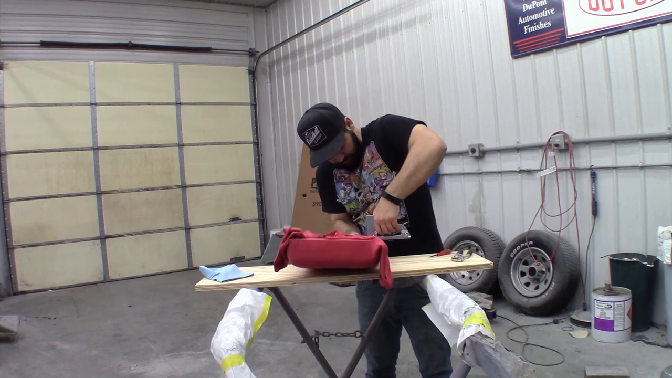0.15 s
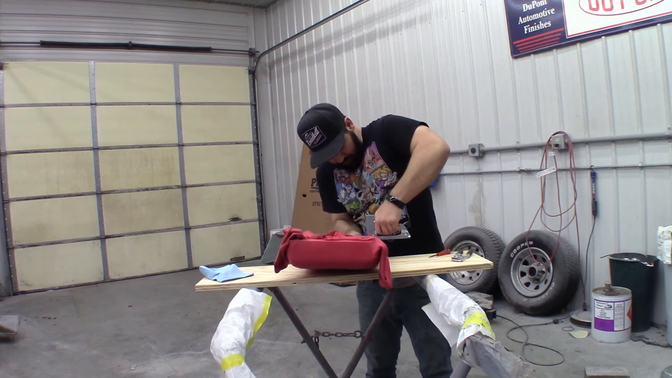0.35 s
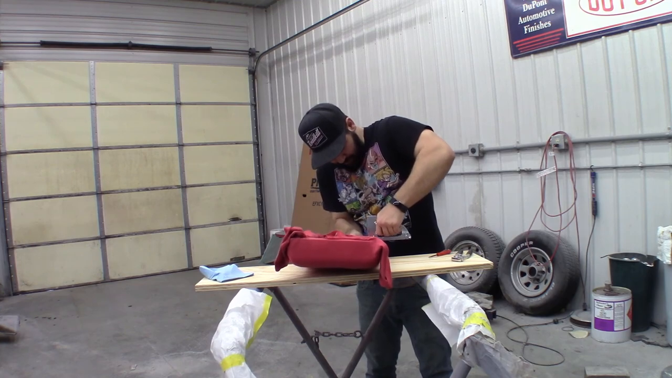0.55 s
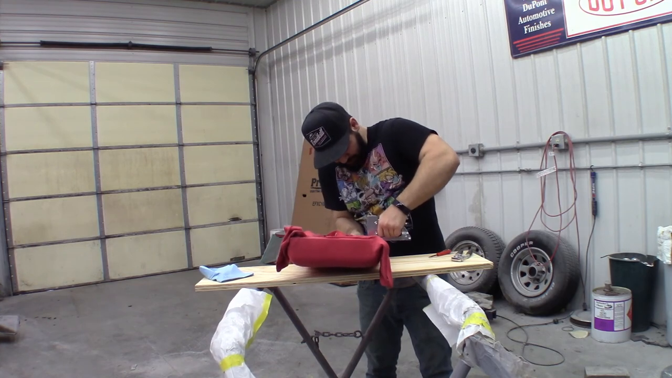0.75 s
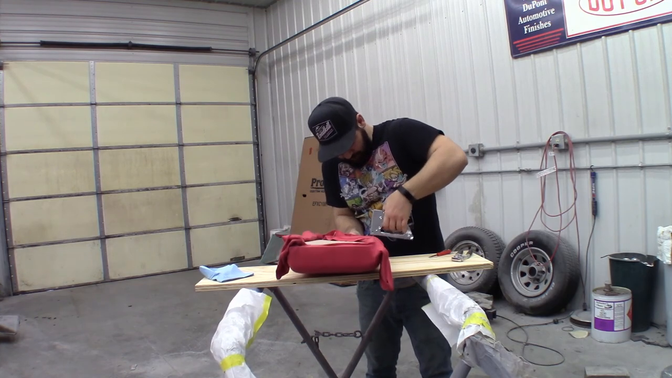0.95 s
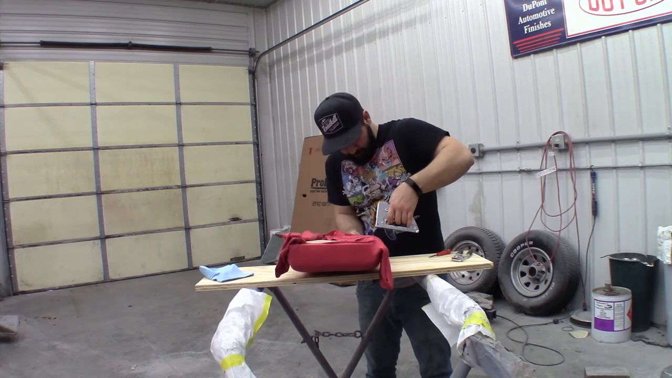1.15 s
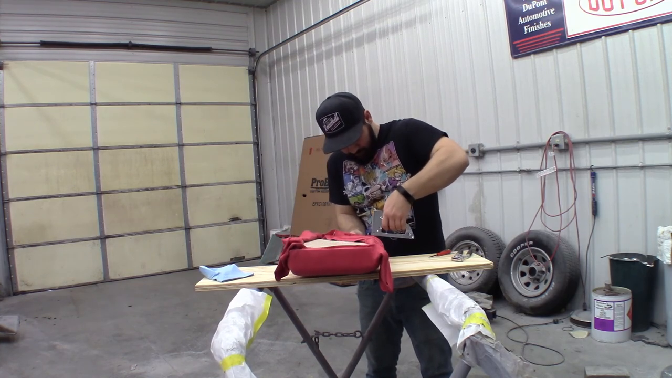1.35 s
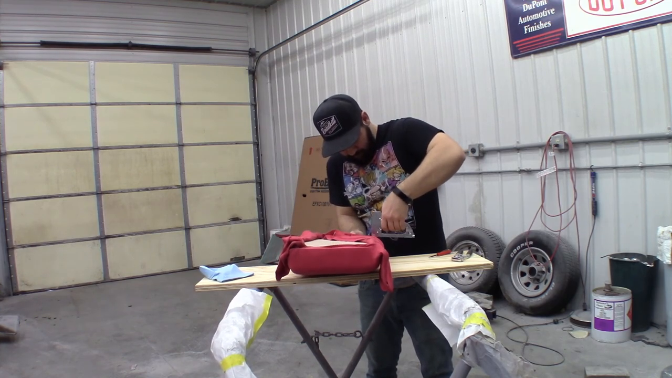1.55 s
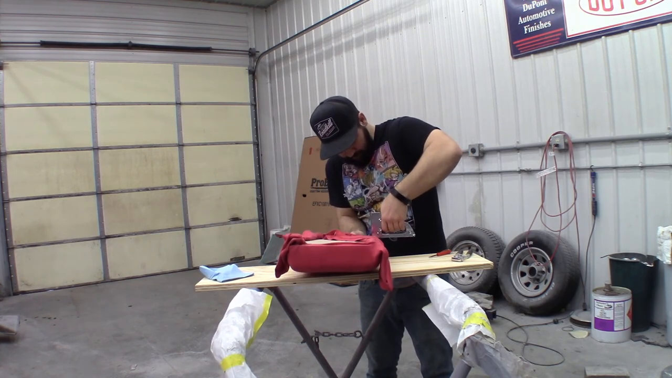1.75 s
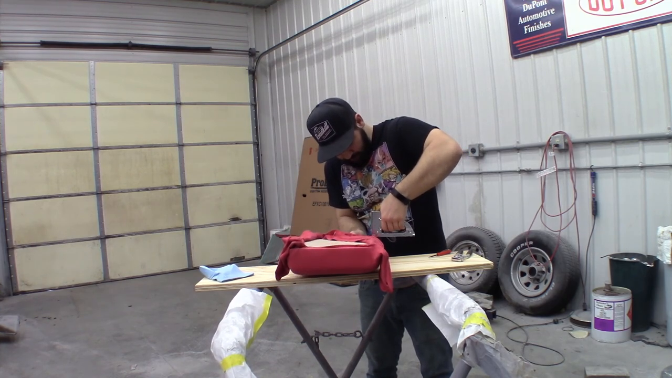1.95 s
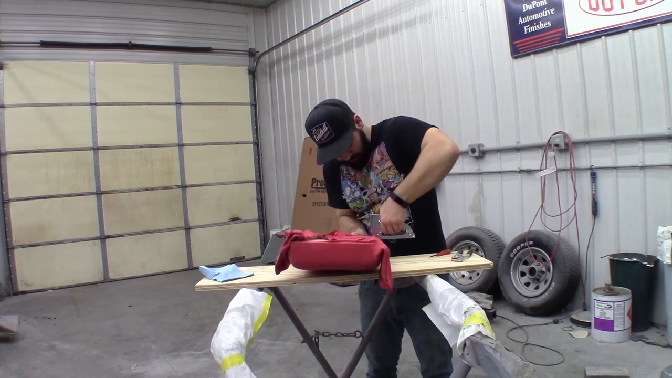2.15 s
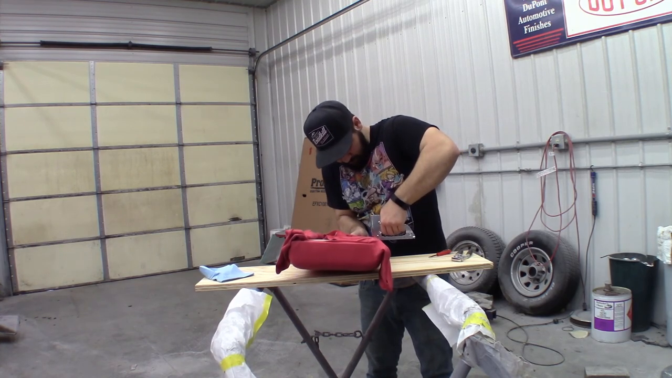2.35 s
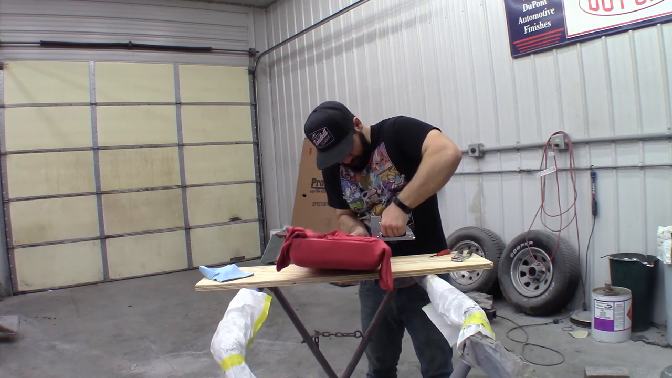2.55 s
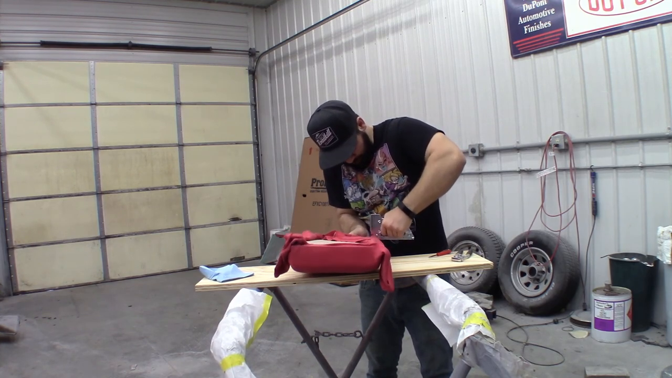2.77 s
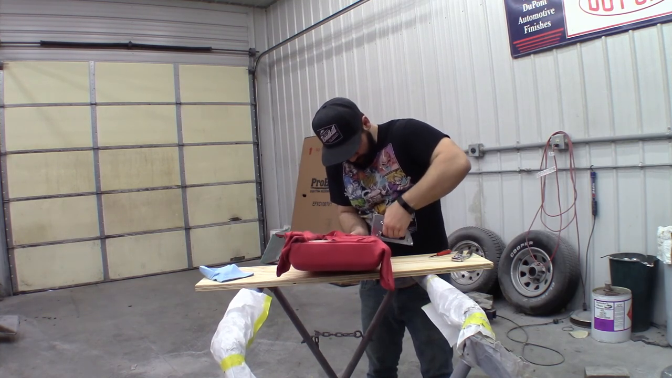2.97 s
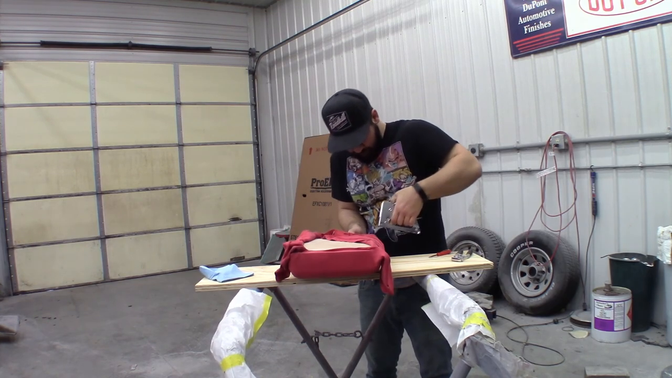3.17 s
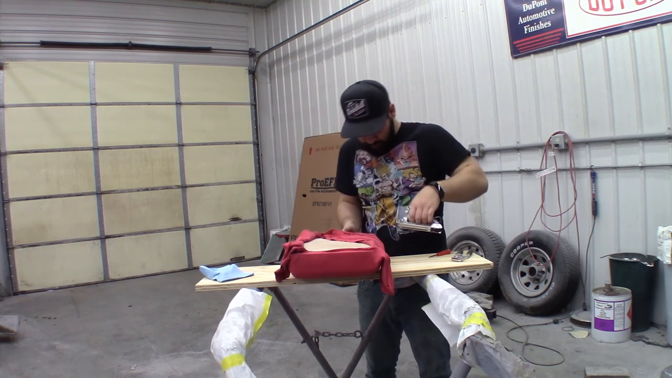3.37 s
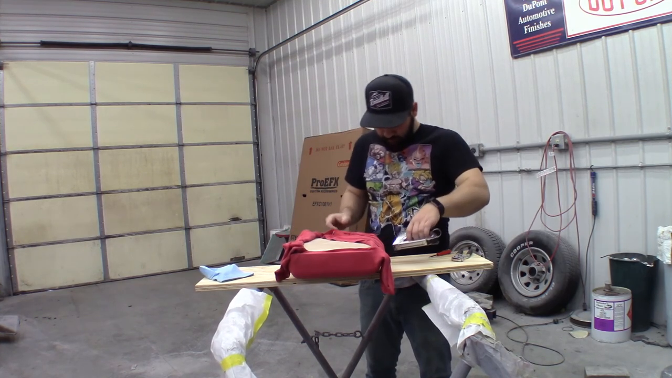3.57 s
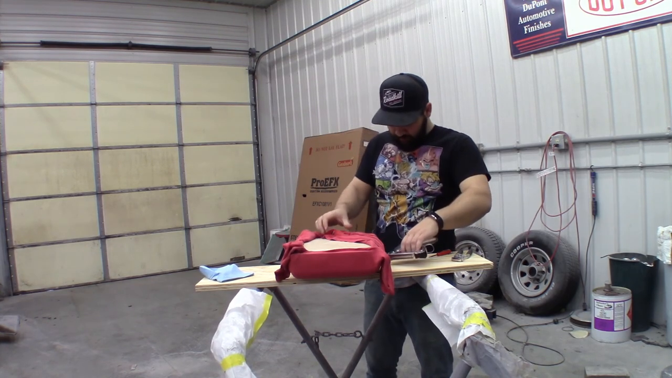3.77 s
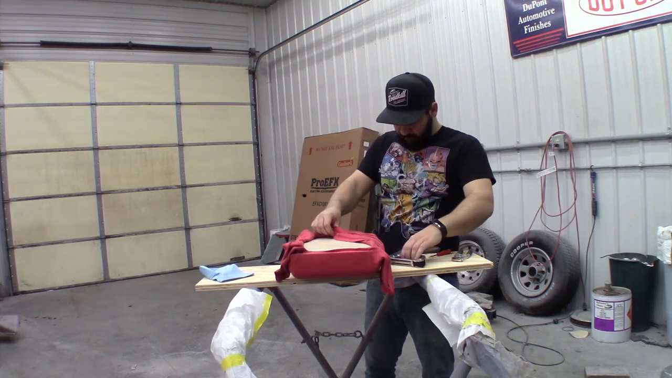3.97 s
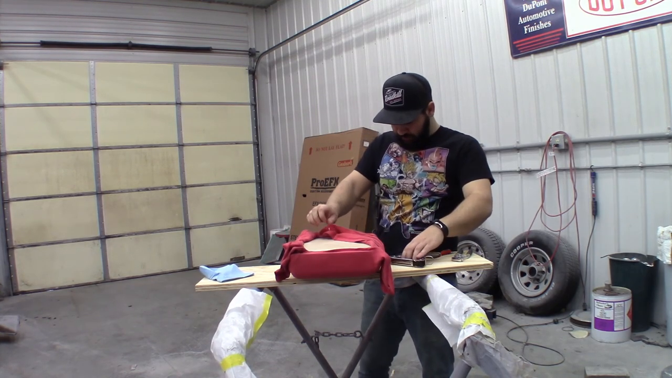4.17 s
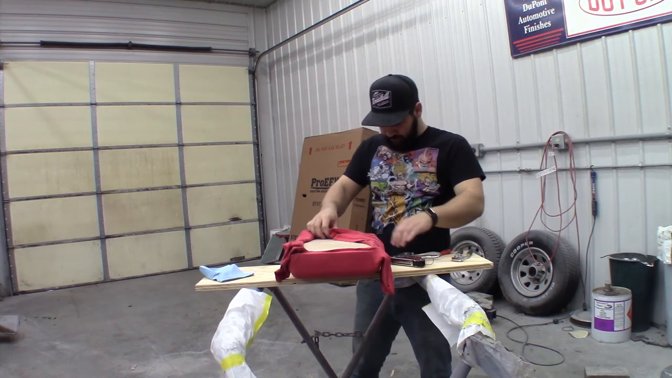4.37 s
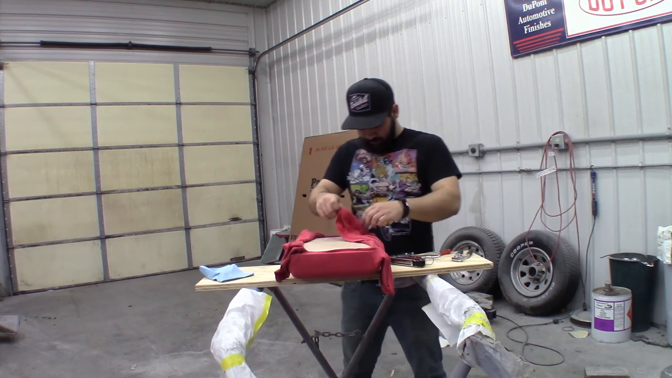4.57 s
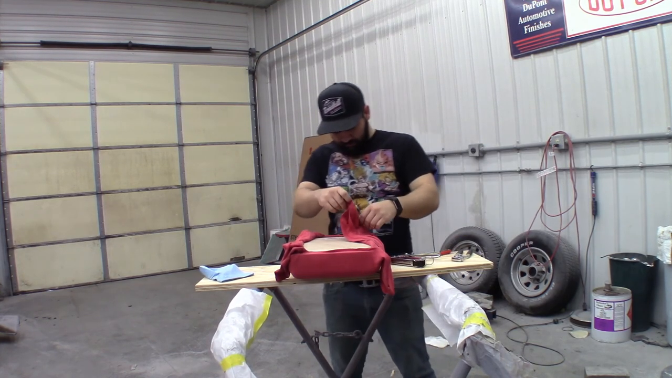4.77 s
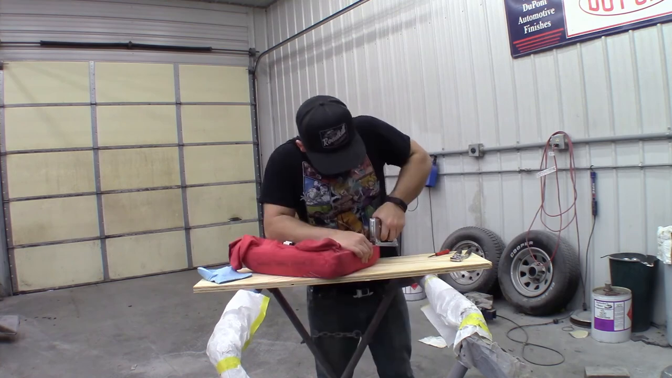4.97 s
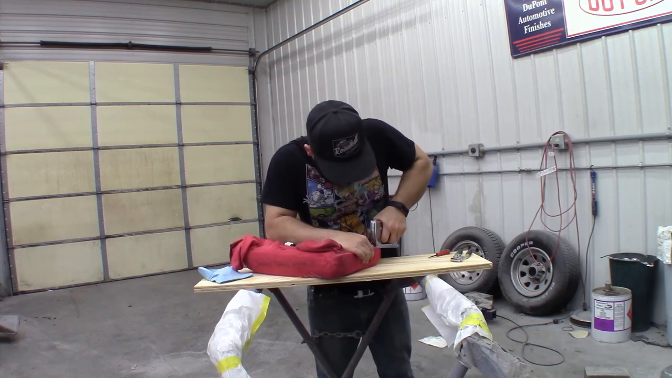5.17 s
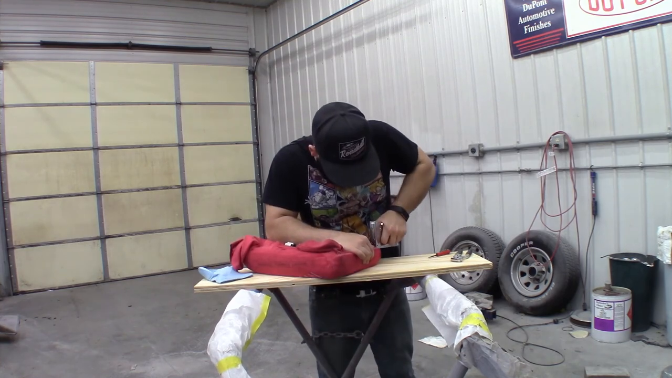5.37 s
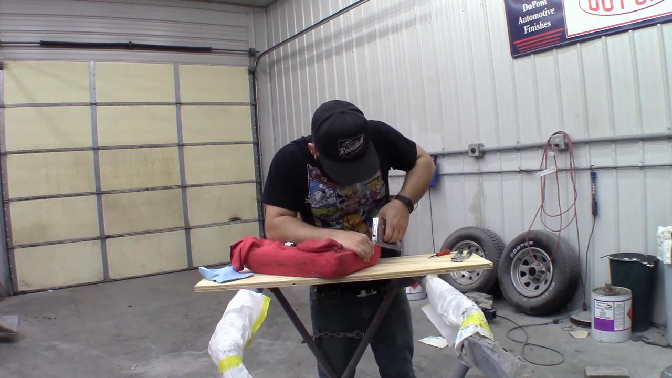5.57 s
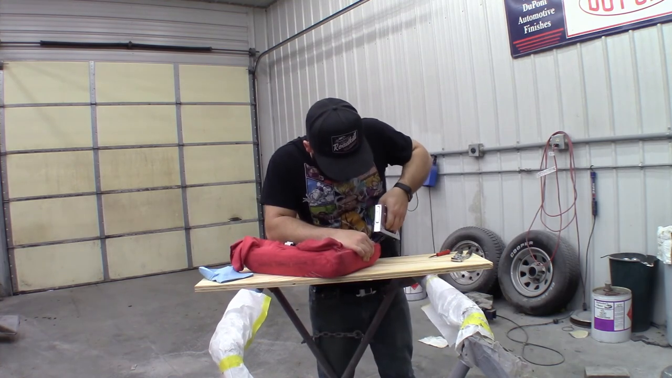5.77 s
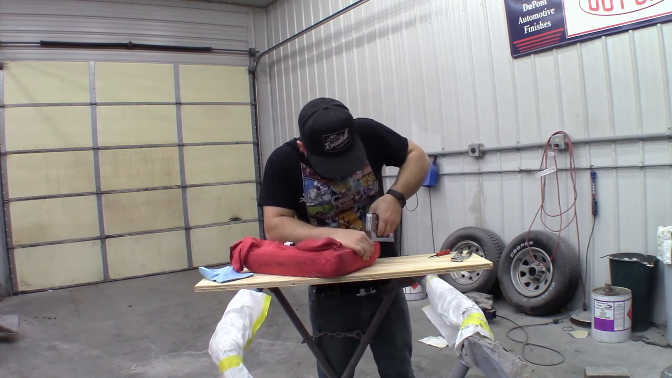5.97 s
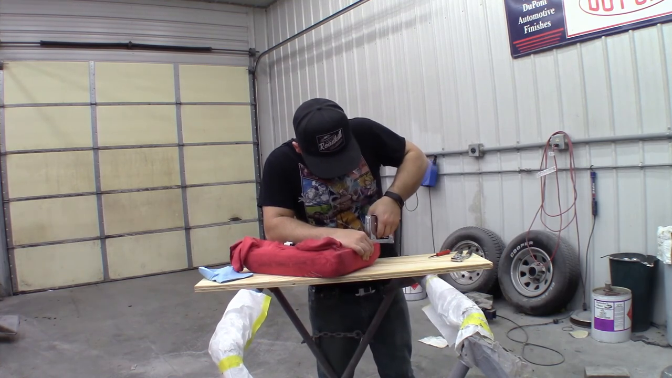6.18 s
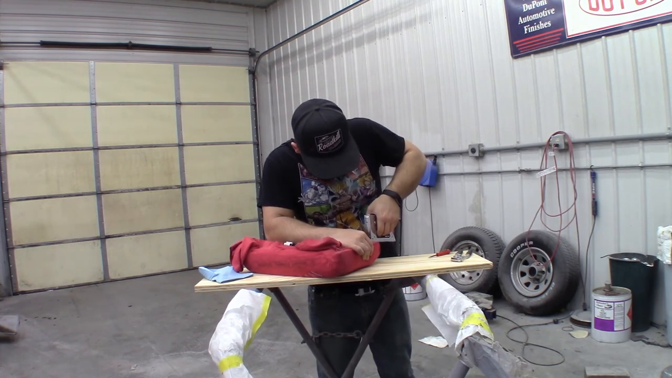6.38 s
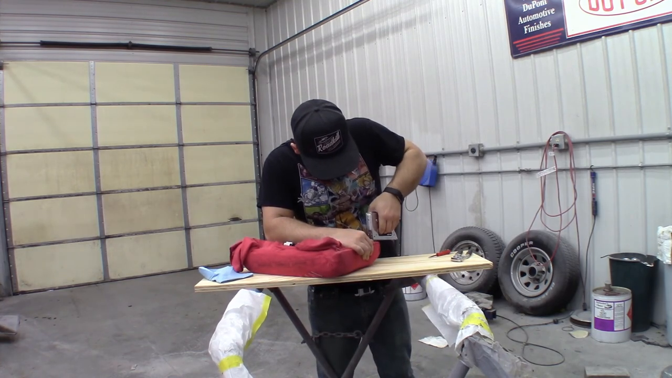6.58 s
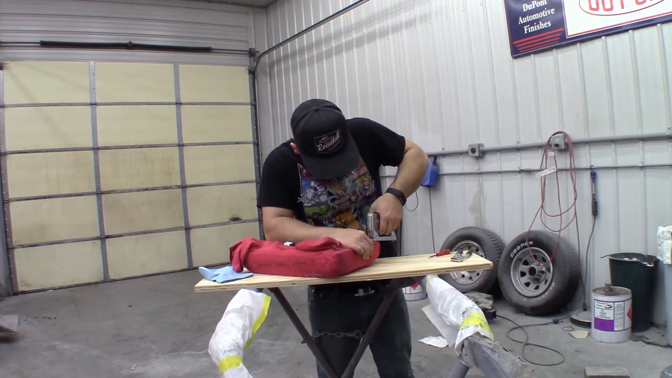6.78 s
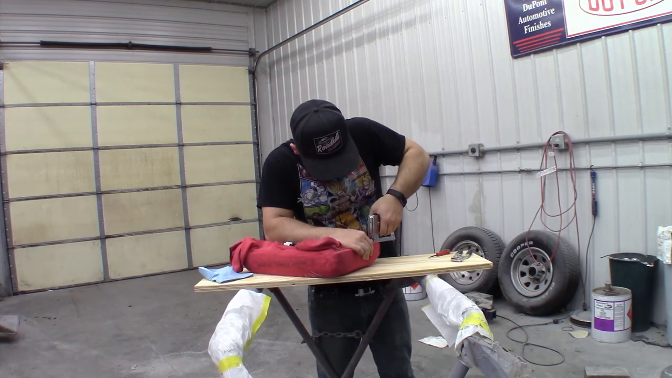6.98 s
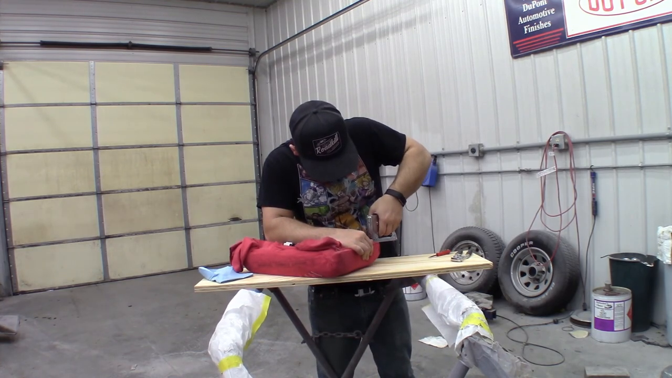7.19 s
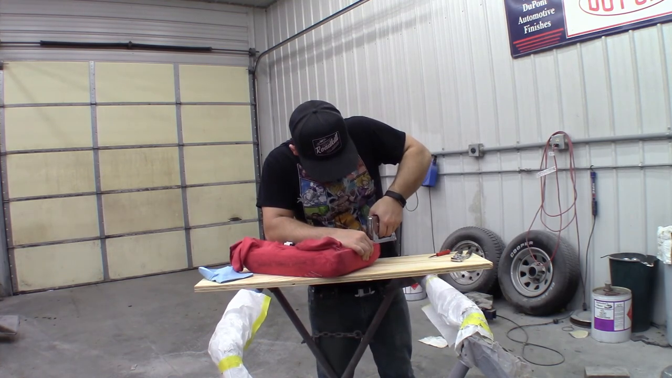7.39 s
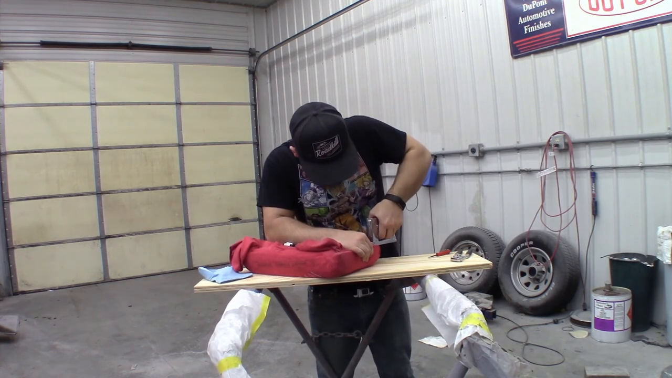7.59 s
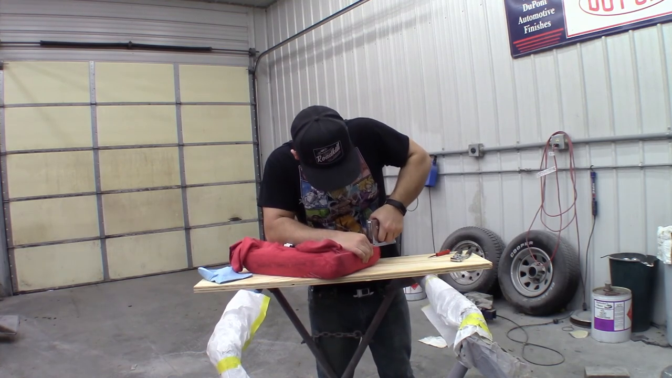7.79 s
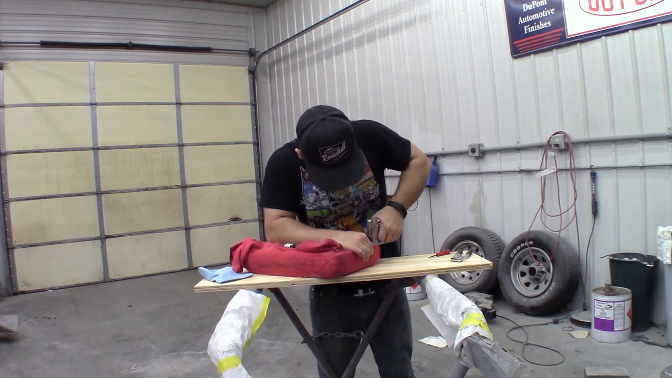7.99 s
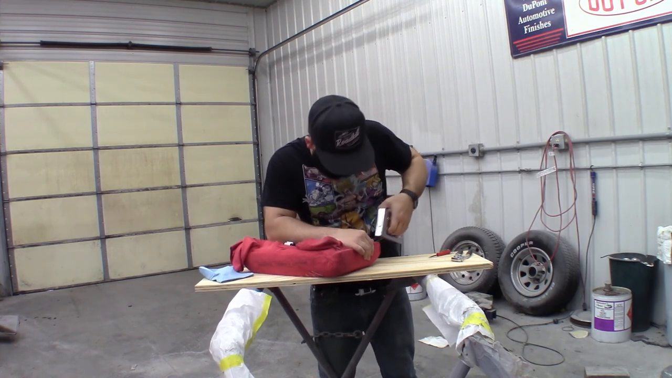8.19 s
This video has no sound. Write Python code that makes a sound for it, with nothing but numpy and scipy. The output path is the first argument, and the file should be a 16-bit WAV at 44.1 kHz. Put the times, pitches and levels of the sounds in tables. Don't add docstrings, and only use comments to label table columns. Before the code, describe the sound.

A hand stapler snaps hard four times, its lever clicking back after each shot; between them it rocks on a board in an echoing hall.

```python
import sys
import numpy as np
from scipy import signal
from scipy.fft import rfft, irfft
from scipy.io import wavfile
from scipy.ndimage import uniform_filter1d

SR = 44100
rng = np.random.default_rng(int(sys.argv[2]) if len(sys.argv) > 2 else 0)


def digitize_waveform(pressure):
    field = np.atleast_2d(pressure).T
    bounded = np.clip(field, -1, 1)
    quanta = np.round(bounded * 32767).astype(np.int16)
    wavfile.write(sys.argv[1], SR, quanta)


def gain_from_db(level_db):
    decades = np.asarray(level_db, float) / 20
    return 10 ** decades


N = 363384

# start_s, peak_db, hall_rms_db, treble_shaded_above_hz
SHOTS = [
    (0.6248, 3, -6.5, 4490),
    (2.786, 3.5, -6.5, 4360),
    (5.361, 2, -8, 10540),
    (7.922, 3, -7.5, 12500),
]
# pitch_hz, level_db (per Hz)
SEAT_COLOURS = [
    [(88, -74), (150, -39.5), (249, -26), (368, -30.5), (589, -1.5), (730, -11.5), (979, -6.5), (1340, -18),
     (1530, -13.5), (1870, -22), (2020, -14), (3040, -18.5), (7920, -23), (11500, -34), (16000, -55.5)],
    [(88, -64.5), (150, -37), (254, -20), (303, -35), (457, -9.5), (730, -4.5), (960, -4.5), (1420, -12.5),
     (3100, -10), (3620, -15.5), (4490, -18), (9080, -22.5), (13700, -39.5), (15100, -56), (16000, -92)],
    [(88, -60), (150, -32), (297, -14), (368, -21.5), (475, -5), (759, -8.5), (837, -3.5), (2060, -11),
     (2500, -4), (2760, -10.5), (3490, -12.5), (9820, -21), (10800, -25), (15100, -38.5), (16000, -92)],
    [(88, -68), (150, -43.5), (291, -15), (391, -21), (484, 3), (716, -6), (837, -2.5), (1310, -7),
     (2060, -17.5), (2600, -9), (4080, -19.5), (6910, -16), (13200, -31), (15300, -43), (16000, -73)],
]
# pitch_hz, width_hz, lift_db
GRIP_RESONANCES = [
    [(1618, 200, 5.5), (2520, 310, 4.5), (3040, 370, 9.5), (4204, 120, 4), (4600, 260, 4.5),
     (5990, 300, 5.5)],
    [(1050, 120, 3), (1622, 97, 4.5), (2300, 300, 1.5), (3007, 580, 2), (4140, 140, 2), (4300, 350, 2.5)],
    [(1303, 150, 4), (1960, 110, 1.5), (2330, 150, -4.5), (3000, 200, 3), (4250, 350, -0.5), (7300, 810, 5)],
    [(1300, 120, 4.5), (1940, 170, 3), (2550, 370, 2.5), (3192, 310, 3), (4500, 510, 5.5), (8500, 930, 3)],
]
# start_s, peak_db, centre_hz, length_ms
LATCH_SLIPS = [
    (.6026, -30.5, 3000, 6.3),
    (2.7493, -24, 3400, 5),
    (2.767, -32.5, 5000, 3.1),
    (5.344, -21.5, 6500, 1.9),
    (7.9097, -21.5, 6500, 1.8),
]
# start_s, peak_db, centre_hz, spring_at_stop_db, spring_at_rebound_db
LEVER_RETURNS = [
    (.934, -17, 8500, -15, -13),
    (3.0675, -10, 6860, -25, -9.5),
    (5.644, -9.5, 7860, -46, -33),
    (8.1844, -12, 7840, -44, -50),
]
# pitch_hz, level_db, t60_s
SPRING_MODES = [(6775, -1, 0.026), (7690, -19, 0.02), (9190, -12, .018), (11200, -14, .015)]
# start_s, peak_db, centre_hz
CLICKS = [(1.139, -38, 8800), (1.586, -46, 6950), (2.2713, -42, 7000), (3.409, -50, 10200),
          (3.676, -48, 9600), (3.7, -51, 9060), (3.806, -45, 7000), (3.877, -31.5, 2450),
          (3.9102, -29.5, 7000), (3.932, -41, 5000), (4.034, -26.5, 3000), (4.044, -28.5, 7840),
          (4.046, -37, 5400), (4.065, -43, 8000), (4.2344, -42, 6000), (4.4105, -39.5, 5000),
          (4.565, -51.5, 8000), (4.75, -56.5, 3535), (5.037, -44, 1940), (5.1837, -51, 9000),
          (8.135, -36, 9000), (5.593, -30, 10970), (5.6454, -13.5, 3960), (5.831, -44, 8000),
          (7.857, -50, 8000), (7.888, -52.5, 5880), (8.21, -45, 10380)]
# start_s, peak_db, centre_hz, length_ms, width_over_centre
SCRAPES = [(.218, -50, 5660, 31, 0.268), (.605, -35.5, 5950, 11, 0.053), (2.275, -47.5, 5300, 31, 0.27),
           (3.904, -35, 2200, 36, 0.9), (3.912, -31, 1364, 14, 0.25), (3.94, -47, 5460, 55, 1.1),
           (4.05, -46.5, 6960, 34, 1.1), (4.25, -42, 3000, 27, 0.46), (4.42, -55, 5970, 88, 0.7),
           (4.84, -53.5, 5536, 110, .9), (5.647, -14, 5200, 3, .3), (5.646, -14, 8500, 5, 0.24),
           (4.2342, -33.5, 3070, 4, 0.39), (4.4104, -34, 2300, 2.5, 0.55), (5.183, -37.5, 4340, 2.5, 0.44),
           (5.184, -36, 1500, 3, 0.87), (1.681, -36.5, 2850, 2, 0.32)]
# start_s, peak_db, contact_ms, favoured_hz,
# ring_freedom (about 0-1)
KNOCKS = [(.083, -30, 0.92, 480, 0.16), (.508, -31, 1, 463, 0.2), (3.876, -35.5, 0.29, 1000, 0.45),
          (3.903, -21, 0.75, 595, 0.6), (3.92, -16.5, 0.49, 605, 1), (3.975, -22.5, 0.97, 590, 0.94),
          (4.03, -28, 0.28, 300, 0.7), (4.068, -25.5, 1, 585, 1.02), (4.09, -26.5, 0.31, 594, 0.9),
          (4.19, -43.5, 0.99, 580, 0.9), (4.222, -33.5, 0.18, 584, 0.9), (4.233, -22, 0.24, 480, 0.7),
          (4.24, -31.5, 0.27, 900, 0.97), (4.255, -25, 0.69, 465, 1), (4.31, -30.5, 1, 584, 0.6),
          (4.4101, -26.5, .35, 720, .35), (4.45, -32, .5, 640, 0.6), (4.52, -44.5, .5, 720, .7)]
# pitch_hz, level_db, t60_s
PLANK_MODES = [(133.8, -2, .09), (264.7, -3.5, 0.16), (278.7, 3.5, .09), (461.4, -4, 0.18),
               (583.6, 0.5, 0.13), (661, -7.5, 0.099), (726, -4.5, 0.0925), (886, -10, .1),
               (1004, -5.5, 0.11), (1380, -7, 0.058), (1620, -4.5, 0.056), (2200, -14.5, .03),
               (2470, -6.5, .025)]
# delay_s, level_db
WALL_ECHOES = [(.0065, -9), (.014, -15), (0.0222, -9.5), (.036, -16.5)]
# pitch_hz, t60_s
HALL_T60 = [(200, 0.8), (500, 1.105), (1000, 1.27), (2000, 1.35), (4200, 1.137), (6500, 0.7), (11000, 0.34),
            (16000, 0.3)]
# pitch_hz, side_minus_mid_db
PORT_WIDTH = [(30, -21.5), (125, -22), (300, -18), (600, -18.5), (1200, -15), (4000, -14.5), (12000, -14)]
# pitch_hz, level_db (per Hz)
FAN_AIR = [(12, -67), (20, -34.5), (111, -24), (139, -19), (206, -7.5), (323, -11.5), (351, -7.5),
           (492, -14.5), (583, -18.5), (690, -16.5), (794, -20.5), (1740, -22), (3520, -31), (15200, -48),
           (16500, -65.5)]
# pitch_hz, width_hz, rms_db
FAN_HUMS = [(75.4, 14, -76.5), (113.5, 4, -75), (206.8, 15, -59), (282, 9.9, -67.5), (298, 36, -63),
            (347.7, 15, -60.5), (413.6, 23, -64), (457.5, 10, -80), (590, 16, -73.5), (806, 14, -70)]


def driver_shots(rise_ms=0.89, rattle_ms=3.7, treble_db=6):
    out, size = np.zeros((2, N)), 4096
    hz = np.fft.rfftfreq(size, 1 / SR)
    t_ms = np.arange(size) * 1000 / SR
    for (start_s, db, hall_db, shade_hz), seat, grip in zip(SHOTS, SEAT_COLOURS, GRIP_RESONANCES):
        lift_db = sum(gain_db * abs(peak(hz, at_hz, width_hz)) ** 2 for at_hz, width_hz, gain_db in grip)
        colour_db = shape(seat, hz) + lift_db + treble_db * (hz / 12000) ** 2
        blow = irfft(causal(colour_db))[:size // 2]
        envelope = (1 - np.exp(-(t_ms / rise_ms) ** 2)) * np.exp(-t_ms / rattle_ms)
        rattle = rng.standard_normal(size) * envelope
        shade = signal.butter(1, shade_hz, fs=SR)
        snap = signal.lfilter(*shade, np.convolve(rattle, blow))
        add(out, start_s, echoed(gain_from_db(db) * snap / abs(snap).max()))
        tail = signal.fftconvolve(blow[None], hall()) / np.linalg.norm(blow)
        add(out, start_s, gain_from_db(hall_db) * tail)
    return out


def steel_ticks():
    out, size = np.zeros(N), 8192
    hz = np.fft.rfftfreq(size, 1 / SR)
    t_ms = np.arange(size) * 1000 / SR
    rows = [(*slip, 1.3) for slip in LATCH_SLIPS]
    rows += [(*lever[:3], 2.7, 0.73) for lever in LEVER_RETURNS]
    rows += [(*click, 1.3, 0.89) for click in CLICKS]
    rows += list(SCRAPES)
    for start_s, db, at_hz, length_ms, width in rows:
        envelope = np.exp(-t_ms / length_ms) * (1 - np.exp(-15 * t_ms / length_ms))
        burst = rng.standard_normal(size) * envelope
        tick = irfft(rfft(burst) * peak(hz, at_hz, width * at_hz) ** 2)
        add(out, start_s, gain_from_db(db) * tick / abs(tick).max())
    return out


def lever_spring(late_s=0.005, rebound_s=0.0225, rise_s=0.00067):
    out, size = np.zeros(N), 8192
    ring = rings(SPRING_MODES, size) * (1 - np.exp(-np.arange(size) / SR / rise_s))
    for start_s, _, _, stop_db, rebound_db in LEVER_RETURNS:
        add(out, start_s + late_s, gain_from_db(stop_db) * ring.sum(0))
        add(out, start_s + rebound_s, gain_from_db(rebound_db) * ring[0])
    return out


def plank_knocks(reach_db=10):
    out, size = np.zeros(N), 8192
    modes = np.array(PLANK_MODES)
    onset = 1 - np.exp(-np.arange(size) / 25)
    for start_s, db, contact_ms, favoured_hz, freedom in KNOCKS:
        side = np.sign(rng.standard_normal(len(modes)))
        octaves_off = abs(np.log2(modes[:, 0] / favoured_hz))
        weights = side * gain_from_db(-reach_db * octaves_off)
        ringing = rings(modes * [1, 1, freedom], size) * onset
        push = np.hanning(int(contact_ms * SR / 1000) + 3)
        knock = np.convolve(weights @ ringing, push)
        add(out, start_s, gain_from_db(db) * knock / abs(knock).max())
    return out


def echoed(dry, share_db=0):
    out = dry.copy()
    for delay_s, db in WALL_ECHOES:
        add(out, delay_s, gain_from_db(db + share_db) * dry[:len(dry) - int(delay_s * SR)])
    return out


def hall(build_s=0.012):
    size = 2 ** 17
    hz, t = np.fft.rfftfreq(size, 1 / SR), np.arange(size) / SR
    noise, tail = rfft(rng.standard_normal((2, size))), 0
    for band_hz in 62.5 * 2 ** np.arange(0, 8.6, 0.5):
        share = np.clip(1 - 2 * abs(np.log2((hz + 1) / band_hz)), 0, 1)
        decay = gain_from_db(-60 * t / shape(HALL_T60, band_hz))
        tail = tail + irfft(noise * share) * decay
    return stereo(tail * (1 - np.exp(-(t / build_s) ** 2)))


def in_hall(dry, echo_db, hall_db):
    tail = signal.fftconvolve(dry[None], hall())[:, :N]
    return echoed(dry, echo_db) + gain_from_db(hall_db) * tail


def fan_drone(air_db=-53):
    hz = np.fft.rfftfreq(N, 1 / SR)
    air = irfft(rfft(rng.standard_normal((2, N))) * gain_from_db(shape(FAN_AIR, hz)), N)
    hums = 0
    for at_hz, width_hz, db in FAN_HUMS:
        unit_rms = np.sqrt(width_hz * np.pi / 2 / SR)
        hums = hums + gain_from_db(db) * peak(hz, at_hz, width_hz) ** 2 / unit_rms
    hum = irfft(rfft(rng.standard_normal((2, N))) * hums, N)
    return stereo(air * gain_from_db(air_db) / air[0].std() + hum)


def stereo(pair):
    size = pair.shape[1]
    width = gain_from_db(shape(PORT_WIDTH, np.fft.rfftfreq(size, 1 / SR)))
    side = irfft(rfft(pair[1]) * width, size)
    return np.array([pair[0] + side, pair[0] - side])


def shape(table, hz):
    table_hz, values = np.transpose(table)
    return np.interp(np.log(hz + 1), np.log(table_hz), values)


def peak(hz, at_hz, width_hz):
    return 1j * hz * width_hz / (at_hz ** 2 - hz ** 2 + 1j * hz * width_hz)


def causal(db):
    cepstrum = irfft(db * np.log(10) / 20)
    half = len(cepstrum) // 2
    cepstrum[1:half] *= 2
    cepstrum[half + 1:] = 0
    return np.exp(rfft(cepstrum))


def rings(modes, size):
    hz, db, t60_s = np.transpose(modes)[:, :, None]
    t = np.arange(size) / SR
    return gain_from_db(db) * np.sin(2 * np.pi * hz * t) * np.exp(-np.log(1000) * t / t60_s)


def add(track, start_s, sound):
    i = int(start_s * SR)
    track[..., i:i + sound.shape[-1]] += sound[..., :N - i]


def scene(low_hz=150, high_hz=12000, right_db=1.2):
    small_band = signal.butter(2, [low_hz, high_hz], "band", fs=SR, output="sos")
    steel = in_hall(steel_ticks() + lever_spring(), echo_db=-2, hall_db=-38)
    wood = in_hall(plank_knocks(), echo_db=-7, hall_db=-39)
    room = driver_shots() + signal.sosfilt(small_band, steel + wood) + fan_drone()
    return room * gain_from_db(np.array([[-right_db], [right_db]]) / 2)


def roll_off(x):
    return signal.sosfilt(signal.butter(12, 16820, fs=SR, output="sos"), x)


def record(dry, duck_db=-6, late_s=0.0077, recover_s=0.065):
    since_s = np.arange(N) / SR - np.array(SHOTS)[:, :1] - late_s
    ducked = (since_s > 0) * np.clip(1 - since_s / recover_s, 0, 1)
    gain_db = uniform_filter1d(duck_db * ducked.sum(0), size=100)
    held = np.clip(dry * gain_from_db(gain_db), -1, 1)
    top_cut = signal.ellip(12, 0.1, 95, 16000, fs=SR, output="sos")
    return roll_off(signal.sosfilt(top_cut, held))


dry = scene()
out = record(dry)
digitize_waveform(out)
```